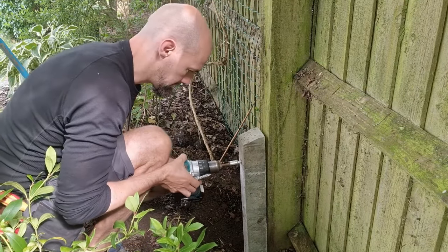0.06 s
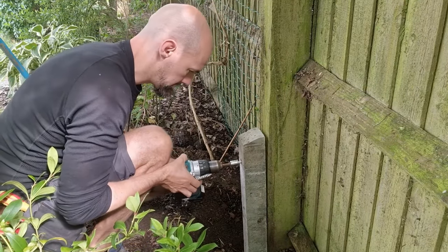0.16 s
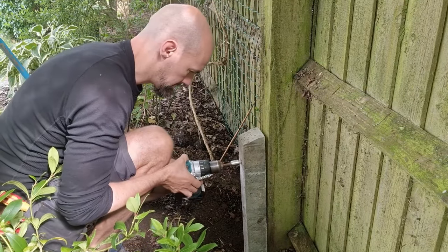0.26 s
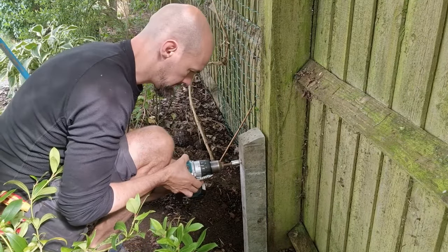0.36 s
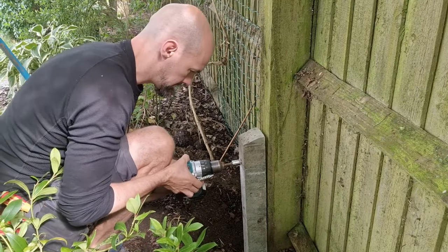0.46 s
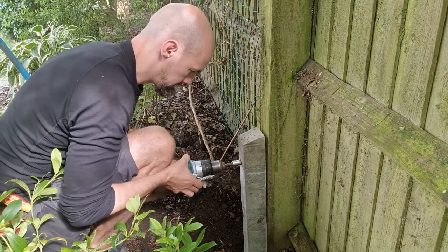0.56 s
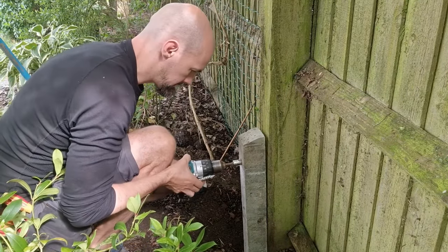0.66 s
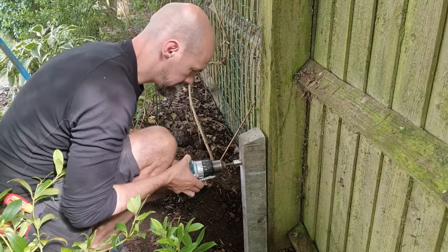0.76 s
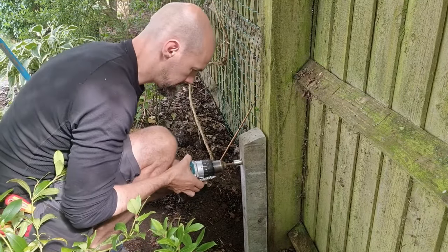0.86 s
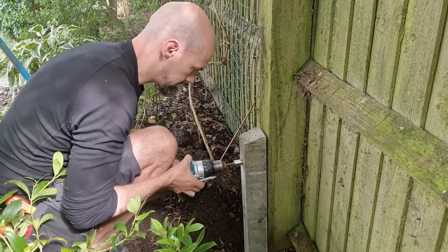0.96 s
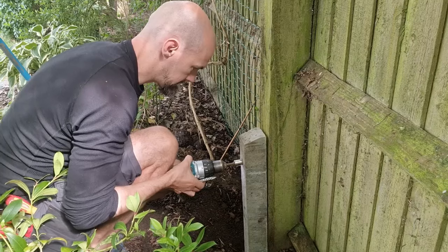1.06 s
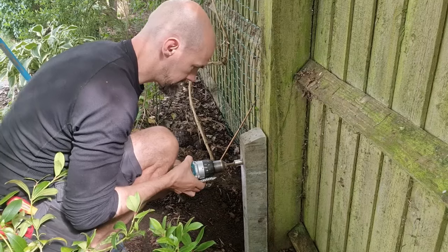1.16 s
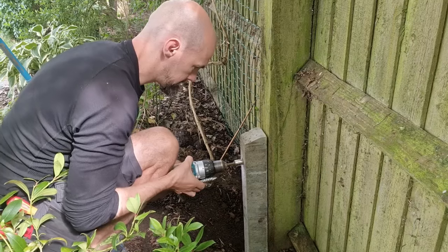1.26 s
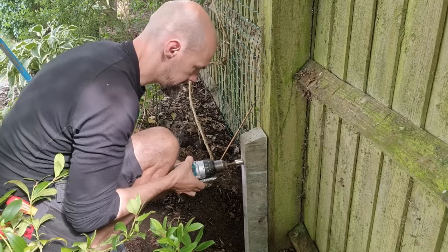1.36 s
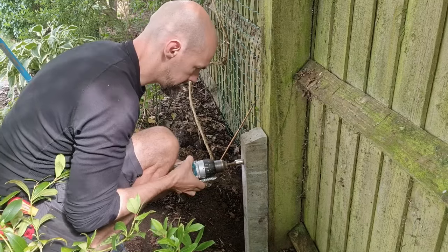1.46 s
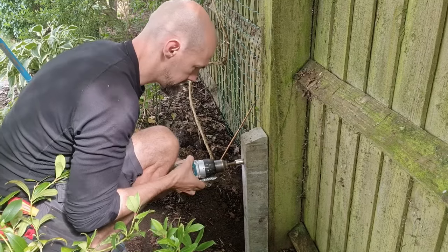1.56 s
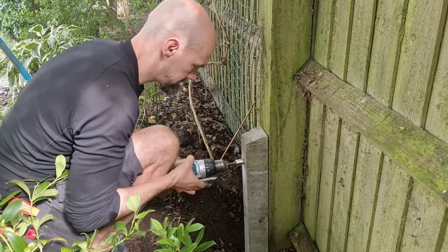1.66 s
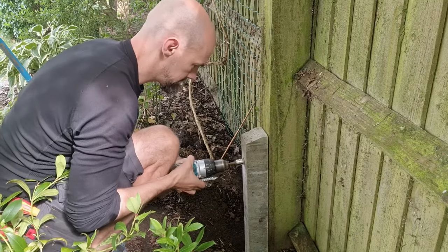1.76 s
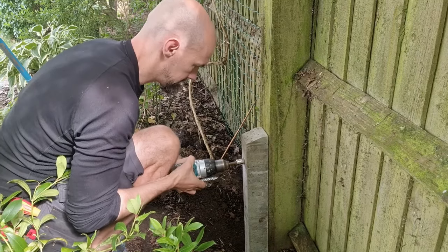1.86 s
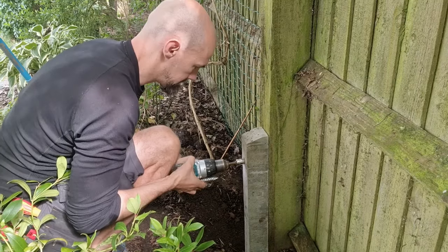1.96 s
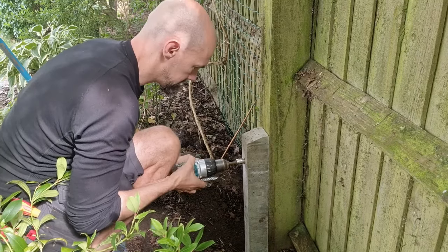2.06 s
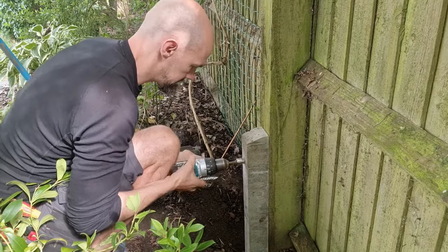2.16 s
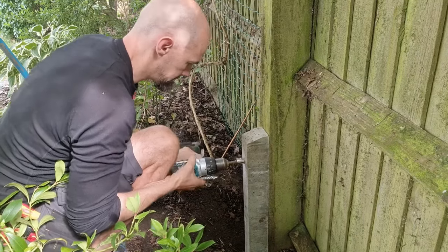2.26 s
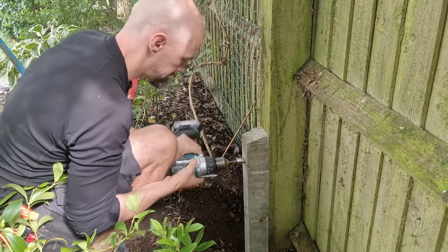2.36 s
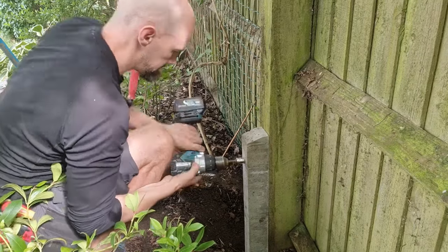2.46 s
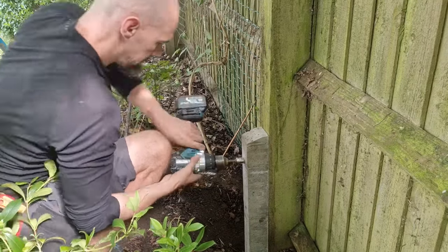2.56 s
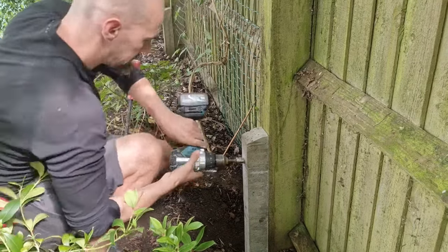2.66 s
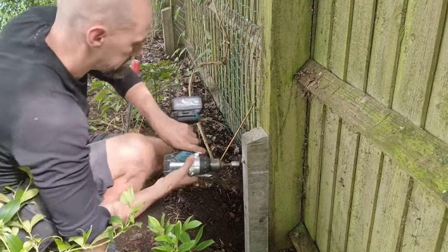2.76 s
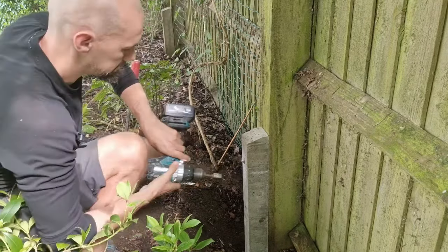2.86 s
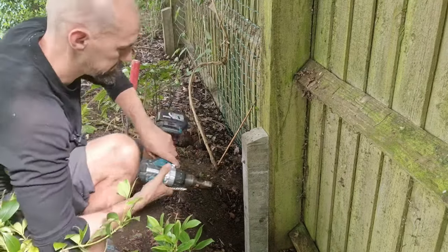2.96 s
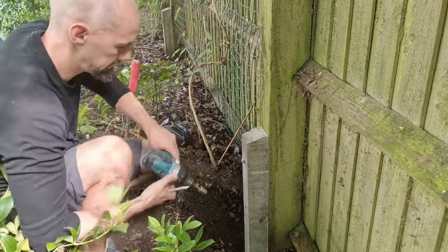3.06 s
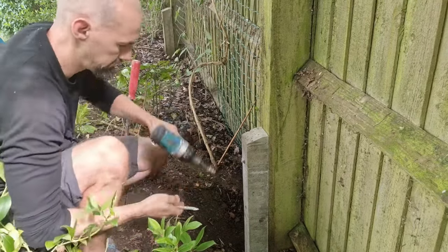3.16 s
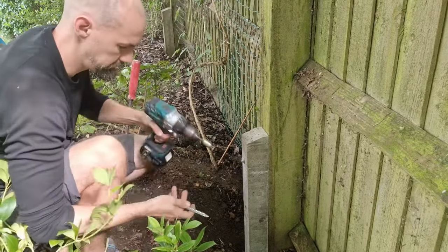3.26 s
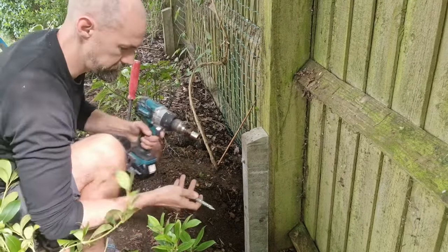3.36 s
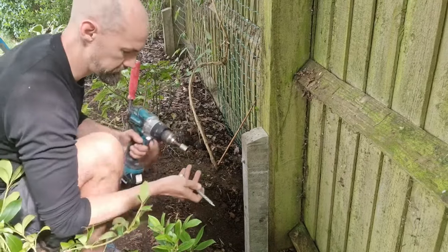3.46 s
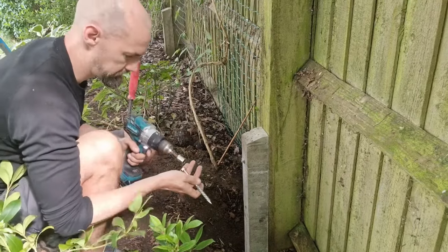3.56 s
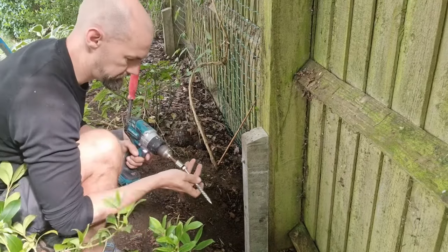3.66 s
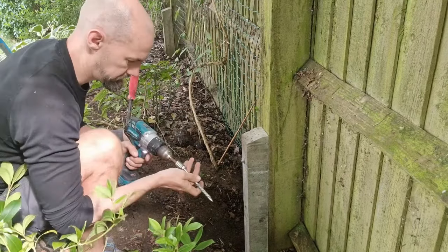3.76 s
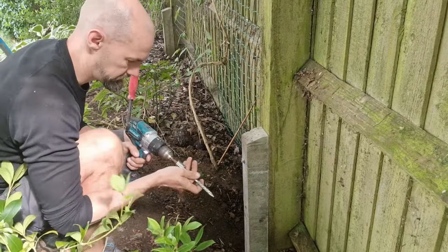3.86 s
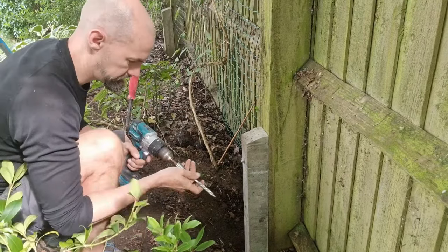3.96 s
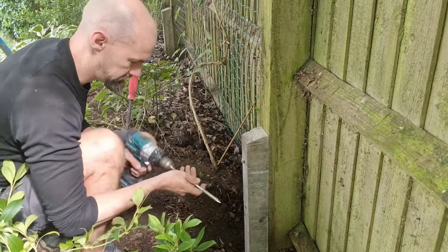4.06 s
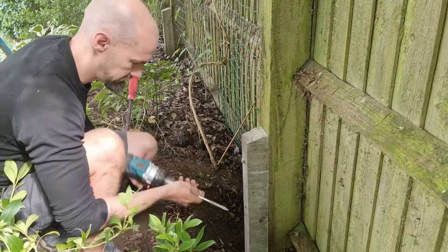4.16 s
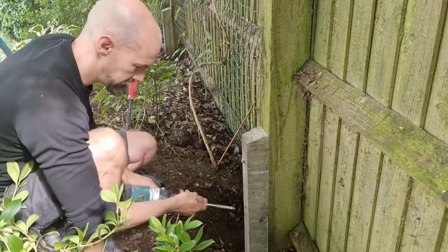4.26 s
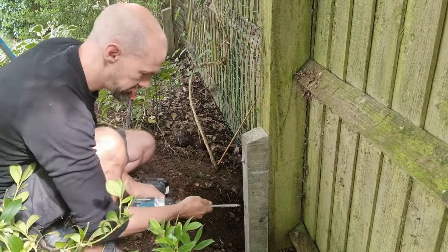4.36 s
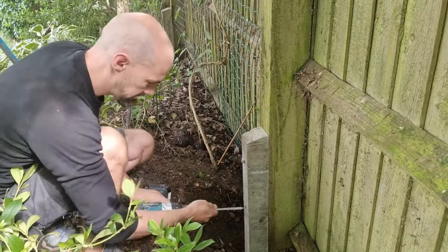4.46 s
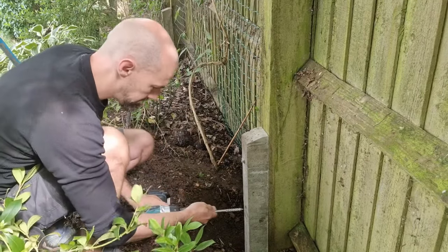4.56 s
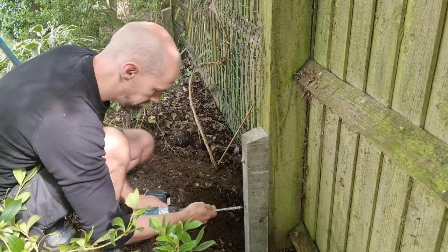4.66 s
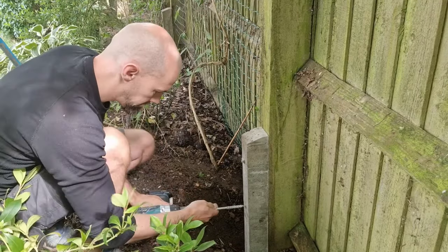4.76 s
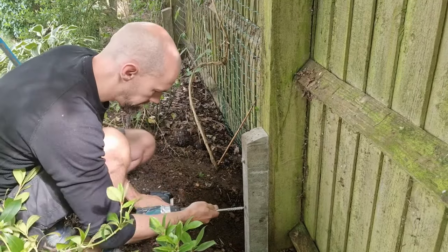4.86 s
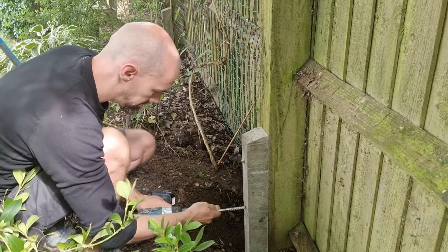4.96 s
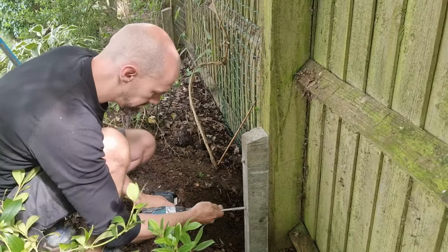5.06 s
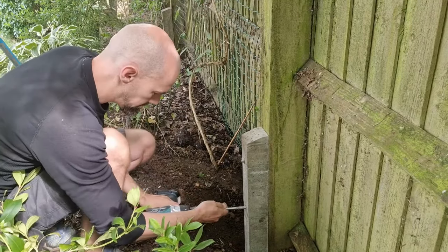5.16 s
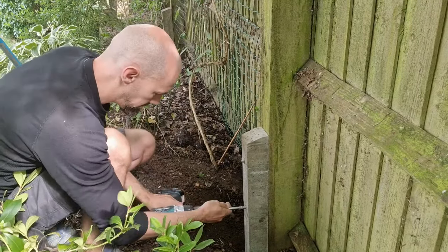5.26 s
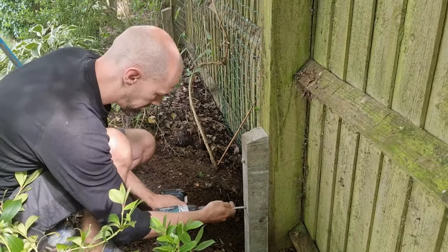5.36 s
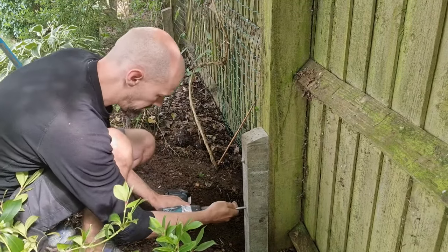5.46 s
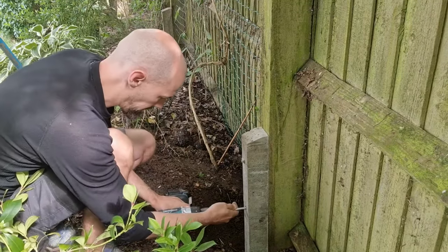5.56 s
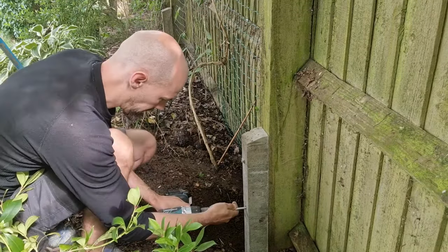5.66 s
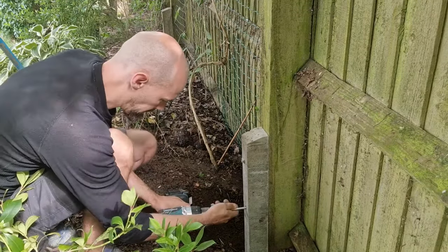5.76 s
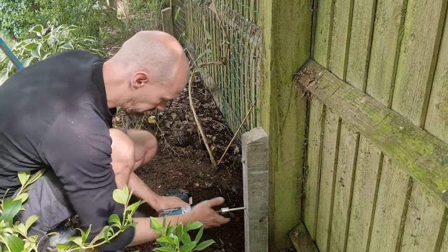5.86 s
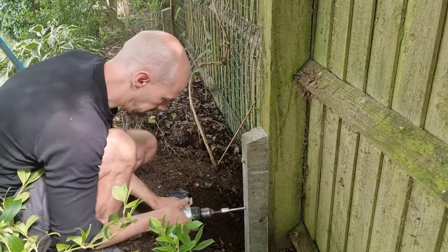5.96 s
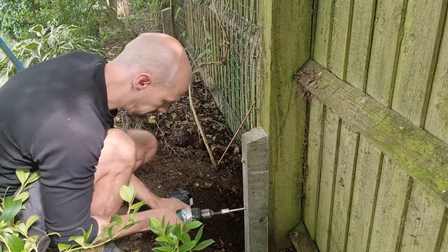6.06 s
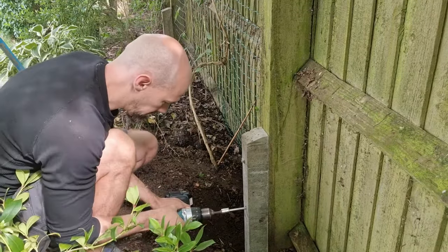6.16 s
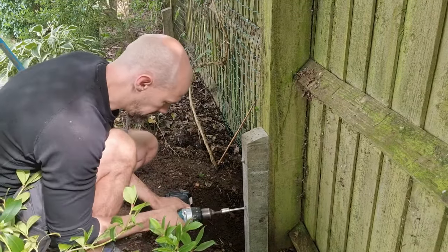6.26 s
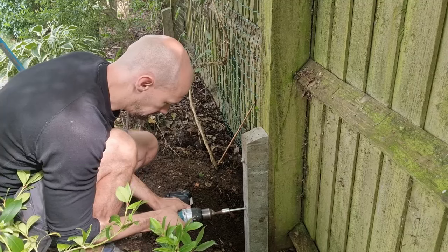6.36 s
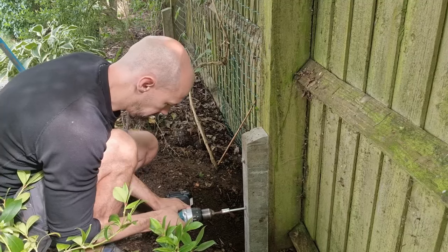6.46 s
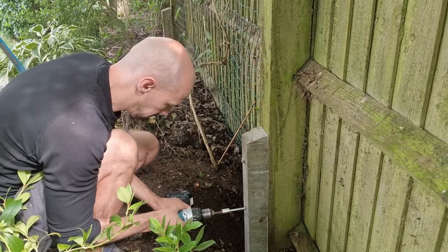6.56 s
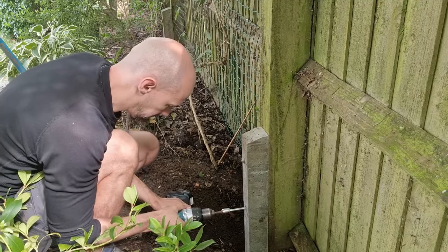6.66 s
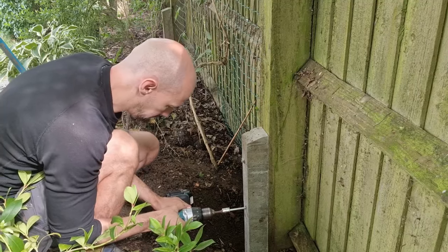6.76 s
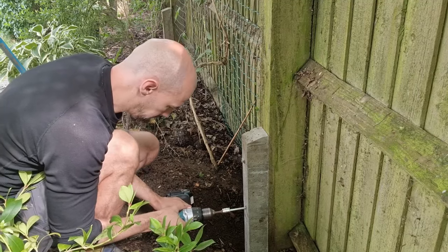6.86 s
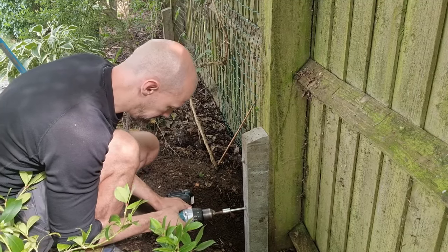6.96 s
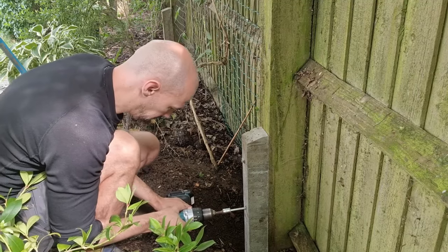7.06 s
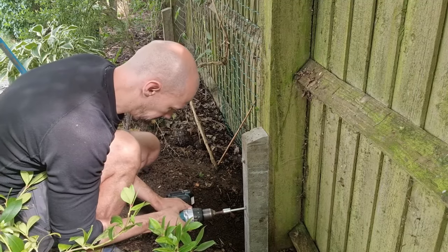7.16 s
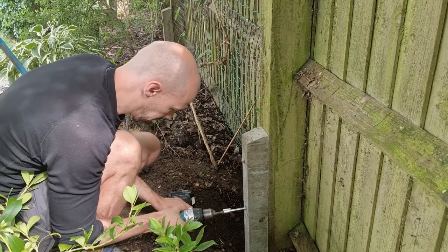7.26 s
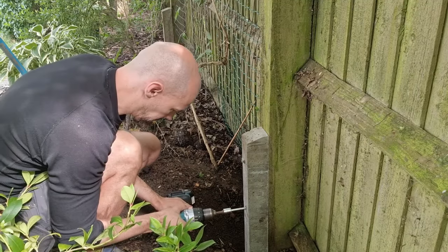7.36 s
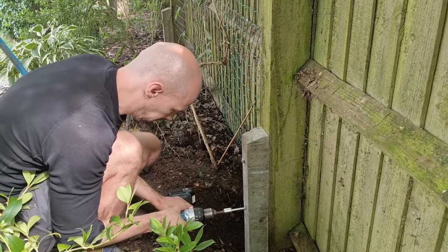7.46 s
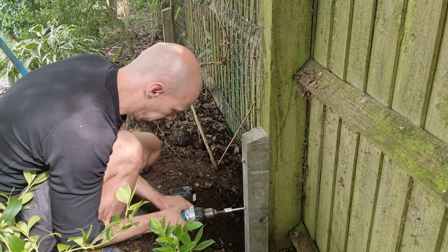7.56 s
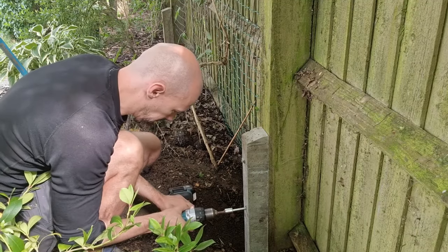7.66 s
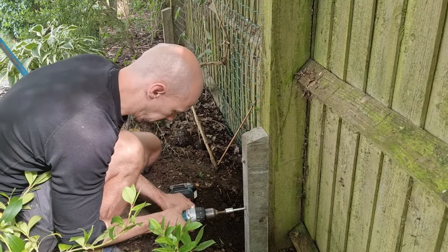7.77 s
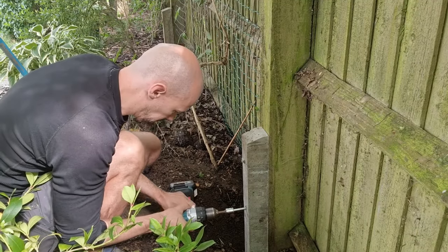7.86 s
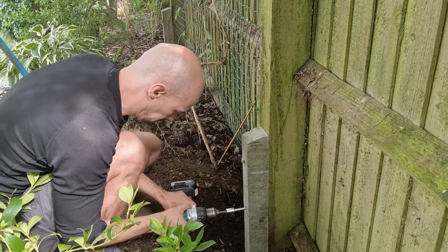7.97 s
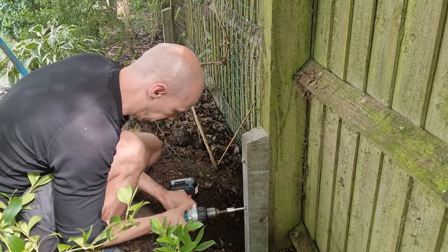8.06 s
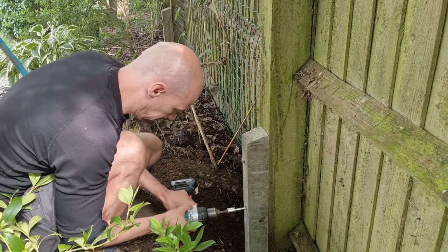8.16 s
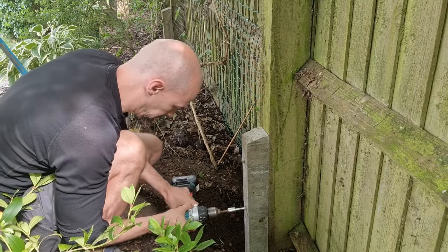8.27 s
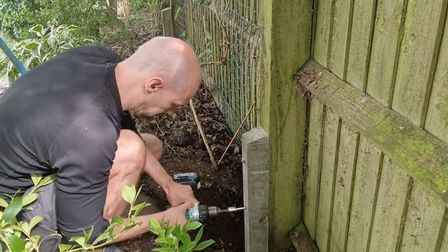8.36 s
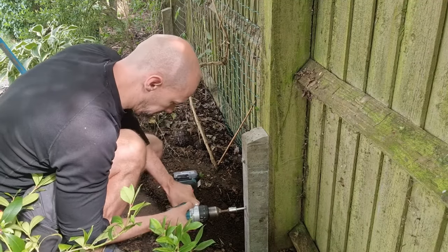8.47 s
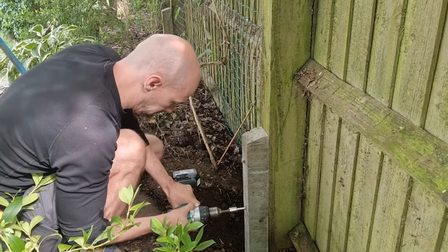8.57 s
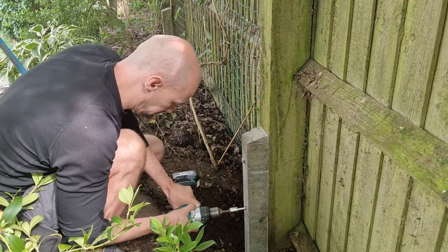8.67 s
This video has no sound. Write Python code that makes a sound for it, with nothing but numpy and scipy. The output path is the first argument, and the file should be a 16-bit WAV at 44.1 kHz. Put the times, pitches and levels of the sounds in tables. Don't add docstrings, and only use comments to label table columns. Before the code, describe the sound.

Nearby dry outdoor sound: a drill already running at full speed quickly slows, creaks along under load and stutters to a stop with a sharp click. Handling clicks, a hard thump and a quick metallic ratcheting mark the bit change. A second run starts as a faint whine, climbs in pitch and settles into loud, rough boring with gear rattle and hiss.

```python
import sys
import numpy as np
from scipy import signal
from scipy.io import wavfile

SR = 44100
rng = np.random.default_rng(int(sys.argv[2]) if len(sys.argv) > 2 else 0)


def generate_wav(sig):
    pcm = np.round(np.clip(np.atleast_2d(sig).T, -1, 1) * 32767).astype(np.int16)
    wavfile.write(sys.argv[1], SR, pcm)


def volts_from_decibels(level):
    exponent = np.asarray(level, float) / 20
    return 10 ** exponent


N = 383669


def rms_one(x):
    return x / np.sqrt(np.mean(x ** 2) + 1e-20)


def in_time(rows):
    s, *columns = np.transpose(rows)
    return [np.interp(np.arange(N) / SR, s, c, -140, -140) for c in columns]


def drift(rate):
    r = np.exp(-32 * np.pi * rate / SR)
    noise = rng.standard_normal(N // 16 + 2002)
    slow = signal.lfilter([1], [1, -2 * r, r * r], noise)[2000:]
    return np.interp(np.arange(N) / 16, np.arange(len(slow)), rms_one(slow))


def band(x, low_hz, high_hz, order=2):
    sos = signal.butter(order, [low_hz, min(high_hz, .45 * SR)], "band", fs=SR, output="sos")
    return signal.sosfilt(sos, x)


def resonate(x, modes):
    out = 0
    for k, (hz, width, db) in enumerate(modes):
        r = np.exp(-np.pi * width / SR)
        top = (1 - r * r) / 2 * np.array([1, 0, -1])
        poles = [1, -2 * r * np.cos(2 * np.pi * hz / SR), r * r]
        out = out + (-1) ** k * volts_from_decibels(db) * signal.lfilter(top, poles, x)
    return out


def grains(per_s, spread_db):
    sizes = volts_from_decibels(spread_db * np.minimum(rng.exponential(1, N), 5)) * rng.choice([-1, 1], N)
    return rms_one(sizes * (rng.random(N) < per_s / SR) + 0.23 * rng.standard_normal(N))


def place(out_s, sound):
    track, at = np.zeros(N + len(sound)), round(out_s * SR)
    track[at:at + len(sound)] = sound
    return track[:N]


def swells(rows, rise_db_s, fall_db_s, floor_db):
    t = np.arange(0, N, 32) / SR
    each = []
    for s, hold, db in rows:
        before, after = np.maximum(s - t, 0), np.maximum(t - s - hold, 0)
        each.append(db - rise_db_s * before - fall_db_s * after)
    return np.interp(np.arange(N) / SR, t, np.maximum(np.max(each, axis=0), floor_db))


def octaves_under(x_hz, hz):
    return np.maximum(np.log2(hz / np.maximum(x_hz, 20)), 0)


def lift(hz, top_hz, half_width_hz, gain):
    return gain / (1 + ((hz - top_hz) / half_width_hz) ** 2)


# t/s, f/Hz, load, level/dB
BORING = [
    (0, 787.7, 0.77, -10),
    (0.45, 770, 1, -10.5),
    (0.6, 754, 1, -11),
    (0.64, 733.3, 0.99, -11),
    (0.68, 644.2, 1, -12.5),
    (0.71, 516.1, 0.38, -13.5),
    (0.76, 372.1, 0.97, -13.5),
    (0.83, 360, 0.95, -14.5),
]
SLOWING = [
    (0.859, 300, 1, -16.5),
    (0.99, 278.2, 1, -17.5),
    (1.08, 274.1, 0.92, -18),
]
CREEPING = [
    (1.25, 281.9, 0.98, -17),
    (1.361, 267.8, 1, -17.5),
    (1.501, 259.9, 0.81, -18),
    (1.64, 257, 0.78, -18.5),
    (1.83, 248.9, 0.87, -17),
    (1.92, 235.9, 1, -16),
    (2.02, 206.9, 1.14, -15),
]
LABOURING = [
    (2.1, 184, 1, -16.5),
    (2.19, 160, 0.83, -16),
    (2.22, 194, 0.89, -15),
    (2.265, 198, 1.2, -13.5),
    (2.3, 258, 1.8, -14.5),
    (2.361, 212.4, 0.76, -12.5),
    (2.431, 271.9, 1.57, -15),
    (2.459, 205.9, 1, -38.5),
    (2.495, 173.8, 1.2, -37),
]
STARTING = [
    (6.225, 25, 0.033, -36.5),
    (6.275, 80, 0, -27),
    (6.3, 113, 0, -20),
    (6.35, 140, 0.03, -20.5),
    (6.4, 157, 0.05, -20.5),
    (6.5, 180, 0.12, -17),
]
SPIN_UP = [
    (6.56, 206.7, 0.11, -16.5),
    (6.62, 249, 0.12, -17),
    (6.7, 384.3, 0.31, -11.5),
    (6.8, 485.4, 0.086, -11),
    (7.0, 613, 0.48, -9.5),
    (7.16, 658, 0.6, -7),
]
BITING = [
    (7.22, 720, 0.95, -8),
    (7.301, 839.4, 0.1, -7.5),
    (7.37, 852, 0.1, -10),
    (7.48, 798.6, 0.72, -6.5),
    (7.601, 854.7, 0.08, -10),
    (7.661, 823, 0.76, -7.5),
    (7.75, 810, 0.92, -9),
    (8.4, 750.3, 1, -10),
    (8.7, 721.5, 1, -9),
]
# f/Hz, half width/Hz, level/dB
SLOT_MODES = [(3517, 190, 12), (1780, 60, 6.5), (2150, 130, -15), (1330, 150, -8)]


def drill_state():
    t = np.arange(N) / SR
    first = in_time(BORING + SLOWING + CREEPING + LABOURING)
    speed, load, effort = np.maximum(first, in_time(STARTING + SPIN_UP + BITING))
    later = t > 4
    burst = lambda db_1, db_2: np.where(later, db_2, db_1)
    below = lambda hz: octaves_under(speed, hz)
    full_hz = 780
    speed = speed * (1 + (0.00418 + 0.029 * ~later * below(251.5)) * drift(9.39))
    bind, free = np.maximum(load - 1, 0), 1 - np.clip(load, 0, 1)
    shallow = later * (1 - np.clip((t - 7.27) / 0.97, 0, 1))
    loaded = later * (1 - free)
    fade = burst(2, 1) * np.minimum(effort + 25, 0)

    output = burst(-14, -19) - 23 * below(full_hz - 50) - 6 * free - 6 * shallow - 19 * shallow ** 8
    middle = burst(-26, -20) - 27 * free - 90 * below(202) + 7 * bind
    middle = middle + lift(2.6 * speed, 540, 55, 10)
    hum = burst(-25.5, -26.5) - 13 * (1 - shallow ** 1.14) * (1 - free) - 70 * below(260.0)
    slot = burst(-20, -18.5) - (5 + 30 * (1 - free) * (1 - shallow)) * below(full_hz) + 30 * bind
    slot = slot - 13 * loaded + 3 * loaded * drift(8.8) - 60 * below(110) - 6 * below(170)
    slot = slot + sum(lift(4 * speed, *mode) for mode in SLOT_MODES)
    slot = slot + later * lift(4 * speed, 3050, 120, 11)
    strain = -53 - 60 * later + lift(3 * speed, 560, 44, 33) + 4 * drift(12)
    labour = -39.5 - 60 * later - 40 * np.maximum(np.log2(np.maximum(speed, 20) / 270), 0)
    labour = labour + 5 * below(204) + 2.5 * drift(12)

    grind = effort - 8.5 - 5 * shallow + 3.46 * (1 - shallow) * below(full_hz)
    buzz = effort + burst(-12.5, -8) + burst(-5, 2.1) * below(full_hz) + 14 * bind - 14 * below(110)
    hiss = effort + burst(-16.5, -18) - 7 * (1 - shallow) * below(full_hz)
    hiss = hiss - 19 * shallow ** 0.49 + 12 * bind
    whine_levels = [x + fade for x in (output, middle, hum, slot, strain, labour)]
    return speed, whine_levels, [effort, grind, buzz, hiss], effort + burst(-29, -52)


def tone(turns, multiple, smear):
    return np.sin(2 * np.pi * multiple * turns + smear * np.sqrt(multiple) * drift(24.0))


# multiple of commutation, level/dB within the family
FAMILIES = [
    [(.648, 0), (1.296, -14)],
    [(2.545, 0), (2.68, -8), (5.36, -12)],
    [(1, -2), (2, 1), (3, -2)],
    [(4, 0), (8, -17)],
    [(3, 0), (5.09, -9)],
    [(.61, -8), (3.25, -2), (4.05, -2), (4.48, -4), (5.45, 0)],
]


def gear_whines(speed, turns, levels):
    out, t = 0, np.arange(N) / SR
    radiate = lambda hz: -12 * octaves_under(hz, 520)
    for family, level_db in zip(FAMILIES, levels):
        for multiple, db in family:
            weak = 0
            if multiple == 1:
                weak = 2 * radiate(speed) - radiate(family[-1][0] * speed)
            if multiple == 1.296:
                weak = np.where(t < 4, -5, 3)
            if multiple == 3 and family is FAMILIES[2]:
                weak = 2 * radiate(speed * 1.1)
            if multiple in (1, 2):
                weak = weak + lift(multiple * speed, 960, 110, 9)
            out = out + volts_from_decibels(level_db + db + weak + 2 + 1.3 * drift(30)) * tone(turns, multiple, .16)
    return out


# multiple, first hole level/dB, free run-up level/dB, second hole level/dB
TEETH = [(5, -11, -8, -19), (5.09, -15, -16, -15), (5.41, -20, -16, -12), (6, -22, -11, -24),
         (7, -24, -12, -22), (8, -24, -9, -24), (10.12, -14, -13, -14), (10.6, -13, -18, -14),
         (11.16, -11, -18, -14), (11.65, -15, -18, -14), (12.2, -17, -9, -14), (13.2, -10, -14, -14),
         (14.2, -12, -14, -14), (14.9, -13, -14, -14), (15.82, -7, -14, -14), (16.8, -11, -14, -14),
         (17.7, -11, -14, -14)]


def tooth_tones(speed, turns, rattle_db):
    out, stage = 0, np.searchsorted([4, 7.3], np.arange(N) / SR)
    slow_db = -45 * octaves_under(speed, 250)
    for multiple, *stage_db in TEETH:
        hz = multiple * speed
        housing = lift(hz, 3080, 260, 1) + lift(hz, 4120, 330, .9)
        level = rattle_db + np.array(stage_db)[stage] + slow_db + 2.8 * drift(14)
        out = out + housing * volts_from_decibels(level) * tone(turns, multiple, .36)
    return out


def rotor_shake(speed, turns, output_db):
    level = -38.0 + 0.5 * (output_db + 17.0) - 60 * (speed < 600) + 5 * drift(23)
    return volts_from_decibels(level) * tone(turns, .25, 0.42)


# carrier multiple, commutation multiple, level/dB
SIDEBANDS = [(1, 1, 0), (1, -1, -4), (1, 0, -10), (1, -2, -12), (2, -1, -20)]


def switching(speed, turns, rattle_db):
    out, t = 0, np.arange(N) / SR
    level = -35.5 - 16 * np.clip((speed - 480) / 300, 0, 1)
    level = level - 6 * np.clip((130 - speed) / 100, 0, 1)
    level = level - 60 * (rattle_db < -37.5) - 60 * (rattle_db < -28) * (t < 4)
    for carrier, side, db in SIDEBANDS:
        phase = 2 * np.pi * (carrier * 7880 * t + side * turns)
        out = out + volts_from_decibels(level + db + 1.65 * drift(7.8)) * np.sin(phase)
    return out


def whines(speed, turns, levels, rattle_db):
    out = gear_whines(speed, turns, levels) + tooth_tones(speed, turns, rattle_db)
    out = out + rotor_shake(speed, turns, levels[0]) + switching(speed, turns, rattle_db)
    return np.sqrt(2) * (speed > 0) * out


# f/Hz, width/Hz, level/dB
HOUSING = [(2973, 600, 1), (3536, 310, 3.5), (4200, 560, 4), (5036, 896, 5), (5720, 1570, -1),
           (8470, 1560, -12.5)]
BUZZ = [(1590, 910, 1), (1806, 280, 10.7), (3140, 490, 0.5)]
POST = [(360, 112, -3), (617, 122, 4), (720, 67, 8), (935, 450, 3.5)]


def work(turns, rattle_db, grind_db, buzz_db, hiss_db):
    fast = np.clip(np.gradient(turns) * SR / 600, .25, 1)
    pulse = 1 + fast * (.3 * np.cos(np.pi * turns / 2) + .2 * np.cos(2 * np.pi * .097 * turns))
    steps = (1 + (.9 - .9 * fast) * np.cos(2 * np.pi * turns)) ** 2
    teeth = pulse * grains(9000, spread_db=-3.0)
    rattle = resonate(teeth, HOUSING) + volts_from_decibels(-13.5) * band(teeth, 3420, 6200)
    rattle = band(rattle, 900, 9100, order=5)
    buzz = resonate(steps * volts_from_decibels(2.7 * drift(25)) * grains(6000, spread_db=-0.5), BUZZ)
    grind = resonate(grains(2500, spread_db=3.0), POST)
    hiss = band(pulse * grains(7000, spread_db=-0.5), 6500, 15000)
    shake = 0.43 * drift(7.1)
    layers = [(rattle, rattle_db), (buzz, buzz_db), (grind, grind_db), (hiss, hiss_db)]
    return sum(rms_one(x) * volts_from_decibels(db - 3.0 + shake + 1.0 * drift(12.4)) for x, db in layers)


# start t/s, top t/s, end t/s, f/Hz, width/Hz, level/dB
SQUEAL = [
    (7.35, 7.85, 8.3, 4320, 320, -11.5),
    (1.95, 2.25, 2.46, 4350, 260, -24),
]


def squeal(turns):
    out, t = 0, np.arange(N) / SR
    planet_knocks = np.diff(np.floor(.097 * turns), prepend=0) * 18 + rng.standard_normal(N)
    for start, top, end, hz, width, db in SQUEAL:
        swell = np.interp(t, [start, top, end], [0, 1, 0]) ** .6
        mode = [(hz, width, 0)]
        ring = rms_one(resonate(resonate(planet_knocks, mode), mode))
        out = out + volts_from_decibels(db + 1.5 * drift(26)) * swell * ring
    return out


# t/s, peak level/dB, f/Hz
CHIPS = [(1.1316, -26, 10710), (1.339, -30, 10890), (1.8422, -23, 11280), (1.928, -22, 12100),
         (2.0565, -28, 13100), (2.3071, -15.5, 13500), (6.344, -53, 11200), (6.511, -30, 12800),
         (7.0142, -31, 11790), (7.1261, -29.5, 11140), (7.445, -23, 11450)]


def chips():
    out, t = 0, np.arange(1500) / SR
    for s, db, hz in CHIPS:
        snap = band(rng.standard_normal(len(t)), hz * 0.88, hz * 1.15)
        out = out + place(s, volts_from_decibels(db) * snap * 2.0 * volts_from_decibels(-60 * t / 0.043))
    return out


# t/s, peak level/dB
KNOCKS = [
    (4.445, -1),
    (4.729, -18.5),
    (3.588, -38),
]
# f/Hz, level/dB, t60/s
KNOCK_MODES = [
    [(335, 1.5, 0.02), (830, -15.5, 0.068), (953, -14, 0.12), (1087, -3.5, 0.059), (1180, -19, 0.04),
     (2730, -23, 0.057), (288, -23, 0.15), (214, -27, 0.2)],
    [(369, 3, 0.087), (770, 6, 0.023), (2020, -17, 0.038)],
    [(8791, 21, 0.05), (8904, 19, 0.06), (8870, 8, 0.16), (3720, 8, 0.035)],
]


def knocks():
    out, t = 0, np.arange(12000) / SR
    for (s, db), modes in zip(KNOCKS, KNOCK_MODES):
        rings = sum(volts_from_decibels(m) * volts_from_decibels(-60 * t / t60) * np.sin(2 * np.pi * hz * t) for hz, m, t60 in modes)
        crack = volts_from_decibels(5.5) * band(rng.standard_normal(len(t)), 290, 2770) * volts_from_decibels(-60 * t / 0.028)
        attack = np.minimum(t / 0.00096, 1)
        for lag, less_db in [(0, 8), (.006, -5.5), (.014, -6.5)]:
            out = out + place(s + lag, volts_from_decibels(db + less_db) * (rings + crack) * attack)
    return out


# t/s, peak level/dB, ring f/Hz, body level/dB, brightness level/dB
CLICKS = [(2.45, -2, 2630, -6.5, -10), (2.592, -32, 830, -3, -16), (2.679, -33, 563, -2, -6),
          (2.708, -15, 550, -13, 5), (3.483, -12, 1900, -13, 4), (3.586, -11, 3670, -7.5, 8),
          (3.685, -18.5, 900, -2.5, 3), (3.719, -23, 784, -17, -30), (3.738, -26, 3760, 2, -19),
          (3.76, -12, 3440, -14, -3), (3.8, -11, 550, -14, -9), (3.818, -15, 1510, -4.5, -9),
          (3.954, -24, 960, -15, -36), (4.108, -32, 900, -6.5, -14)]
FITTING = [ (4.569, -18, 2290, 0, 10.5), (4.779, -19, 312, -8, -19), (4.979, -24.5, 362, -13, -31),
           (5.043, -26, 1250, -14, 12), (5.524, -22.5, 355, -18, -7), (5.558, -19, 11100, -12, 1),
           (5.585, -20.5, 6580, -10.5, 4), (5.671, 0, 8300, -20, 1), (5.758, -15, 1290, -8.5, 0),
           (5.948, -11, 710, -8, -32), (6.02, -28.5, 770, -8, -10), (6.088, -27.5, 820, -3.5, -1),
           (6.226, -23.5, 7760, -2, -33)]


def clicks():
    out, t = 0, np.arange(6000) / SR
    for s, db, hz, body_db, bright_db in CLICKS + FITTING:
        noise = rng.standard_normal((3, len(t)))
        t60 = 0.035 * (1000 / hz) ** 0.19
        fall = volts_from_decibels(-60 * t / t60) * np.minimum(t / 0.0018, 1) ** 2
        ring = np.sin(2 * np.pi * hz * t) * 0.65 + 0.6 * rms_one(band(noise[0], hz * 0.85, hz * 1.17))
        body = band(noise[1], 330, 2870) + resonate(noise[1], [(3530, 140, 1)])
        body = volts_from_decibels(body_db + 7.0) * rms_one(body)
        crack = volts_from_decibels(bright_db + 1.5) * rms_one(band(noise[2], 5200, 19700)) * fall
        out = out + place(s, volts_from_decibels(db - 4.5) * fall * (ring + body + crack))
    return out


# f/Hz, width/Hz, level/dB
CHUCK = [(524, 570, -3), (1095, 193, 4.5), (1540, 160, -4), (2470, 430, -11.5), (3290, 250, -11),
         (4540, 230, -18), (6080, 290, -16)]
# t/s, peak level/dB
CATCHES = [(5.035, -29), (5.058, -28), (5.086, -21), (5.123, -14), (5.133, -10), (5.174, -9), (5.221, -17),
           (5.254, -8), (5.317, -18), (5.375, -11), (5.437, -13)]


def ratchet():
    t = np.arange(N) / SR
    twist = np.clip((t - 5.058) / 0.004, 0, 1) * np.clip((5.463 - t) / 0.006, 0, 1)
    pawl = (rng.random(N) < 240 / SR) * volts_from_decibels(2.6 * rng.standard_normal(N))
    rub = signal.lfilter([1], [1, -0.985], pawl) * rng.standard_normal(N)
    sleeve = rms_one(resonate(rms_one(rub) + 0.9 * grains(900, spread_db=2.0), CHUCK))
    jaws = 0
    for s, db in CATCHES:
        fall = volts_from_decibels(db + 4.5 - 60 * t[:3000] / 0.048)
        jaws = jaws + place(s, fall * rng.standard_normal(3000))
    return volts_from_decibels(-29 + 1.3 * drift(26)) * twist * sleeve + resonate(jaws, CHUCK)


# t/s, length/s, level/dB, centre f/Hz
SCUFFS = [
    (2.955, .011, -27, 7300),
    (2.985, .012, -28, 7600),
    (2.996, 0.015, -35, 7600),
    (3.02, .012, -27, 7500),
    (3.03, 0.013, -30, 7000),
    (3.054, 0.0078, -37, 7600),
    (3.063, 0.0043, -31, 7600),
    (3.07, .007, -28.5, 7600),
    (3.472, .012, -34, 5200),
    (4.769, 0.014, -39.5, 2800),
]
# t/s, peak level/dB
TICKS = [(5.0828, -28), (5.116, -22), (5.1596, -25), (5.1916, -22), (5.234, -28), (5.2549, -34),
         (5.2978, -23), (5.321, -22), (5.3472, -36), (5.3682, -27), (5.3866, -24), (5.4405, -29),
         (5.454, -25)]


def scuffs():
    out, t = 0, np.arange(2000) / SR
    pawl_ticks = [(s, 0.0083, db - 11.0, 12000) for s, db in TICKS]
    for s, length, db, hz in SCUFFS + pawl_ticks:
        noise = rng.standard_normal(2000)
        shape = np.clip(np.minimum(t, length - t) / 0.0021, 0, 1)
        narrow = rms_one(band(noise, hz * 0.89, hz * 1.11))
        skirt = 0.78 * rms_one(band(noise, hz * 0.67, hz * 1.6))
        out = out + place(s, volts_from_decibels(db) * shape * (narrow + skirt))
    return out


# delay t/s, level/dB
ECHOES = [
    (.011, -21),
    (.031, -21.5),
]


def echoes(hits):
    return sum(volts_from_decibels(db) * place(lag, band(hits, 130, 3300, order=1)) for lag, db in ECHOES)


# t/s, length/s, level/dB, brightness level/dB
MOVES = [(2.44, 0.073, -38.5, -7), (2.544, 0.059, -42.5, -3), (2.675, 0.071, -43.5, -1.5),
         (2.974, 0.073, -48.5, 19.5), (3.086, 0.21, -53, -4), (3.402, 0.15, -53.5, 9.5),
         (3.556, 0.31, -48, 4.5), (3.724, 0.19, -44.5, -9), (4.169, 0.16, -36.5, -6),
         (4.347, 0.01, -37.5, 12.5), (4.435, 0.054, -38.5, 3), (4.546, 0.077, -52, 7),
         (4.795, 0.094, -53.5, 2), (5.093, 0.12, -36.5, -9), (5.321, 0.091, -32, -9),
         (5.542, 0.24, -54, 12), (5.926, 0.038, -37, -6), (6.05, 0.054, -51, 1)]


def rustle():
    levels = []
    for less_db, share in [(0.5, 0.15), (-4.5, 0.12), (-1.5, 0.78)]:
        rows = [(s, hold, db + less_db + share * tilt_db) for s, hold, db, tilt_db in MOVES]
        levels.append(swells(rows, rise_db_s=490, fall_db_s=210, floor_db=-57.5))
    clump = volts_from_decibels(7.1 * drift(35))
    dull_modes = [(388, 170, 0.5), (820, 360, 0.5), (1090, 94, 2.5), (1530, 620, -5.5)]
    dull = resonate(grains(600 * clump, spread_db=3.5), dull_modes)
    fine = grains(1200 * clump, spread_db=2.5)
    middle = resonate(fine, [(2300, 450, 0), (3350, 450, 0), (4600, 900, -7)])
    ticks = volts_from_decibels(3 * drift(40)) * grains(6000, spread_db=2.5)
    bright = band(ticks, 2670, 20000) + resonate(ticks, [(7600, 4300, 0.93)])
    return sum(rms_one(x) * volts_from_decibels(db + 2.28) for x, db in zip((dull, middle, bright), levels))


# t/s, level/dB
THUDS = [(0.69, -26.5), (2.44, -37.5), (3.0, -43), (3.5, -46.5), (3.8, -48.5), (4.37, -34), (4.5, -36),
         (4.75, -44.5), (5.15, -37.5), (5.46, -41), (5.7, -48), (5.971, -41), (6.4, -42)]


def ground(shake_db):
    rows = [(s, 0, db) for s, db in THUDS]
    thud_db = swells(rows, rise_db_s=123, fall_db_s=59, floor_db=-61)
    rumble = rms_one(band(rng.standard_normal(N), 50, 303))
    return volts_from_decibels(np.maximum(thud_db, shake_db) + 1.2 * drift(24)) * rumble


# start t/s, end t/s, f/Hz, level/dB
BIRD = [
    (4.4, 4.7, 6200, -55),
    (4.8, 5.05, 4250, -55),
    (4.82, 5.5, 6400, -56),
]


def bird():
    out = 0
    for start, end, pitch_hz, level_db in BIRD:
        size = round((end - start) * SR)
        note = band(rng.standard_normal(size), pitch_hz - 90, pitch_hz + 90)
        out = out + place(start, volts_from_decibels(level_db) * rms_one(note) * np.hanning(size) ** .5)
    return out


def air():
    return volts_from_decibels(-63) * rms_one(band(rng.standard_normal(N), 150, 9000, order=1))


def scene():
    speed, levels, noise, shake_db = drill_state()
    turns = np.cumsum(np.maximum(speed, 0)) / SR
    drill = whines(speed, turns, levels, noise[0]) + work(turns, *noise) + squeal(turns)
    small_body = signal.butter(3, 130, "high", fs=SR, output="sos")
    drill = signal.sosfilt(small_body, drill)
    hits = chips() + knocks() + clicks() + scuffs()
    garden = ground(shake_db) + bird() + air()
    return (drill + hits + ratchet() + echoes(hits) + rustle() + garden)[None]


def band_limit(x):
    return signal.sosfilt(signal.butter(12, 16320, fs=SR, output="sos"), x)


def record(dry):
    rounded = 0.96 * np.tanh(dry / 1.12)
    low_cut = signal.sosfilt(signal.butter(3, 52, "high", fs=SR, output="sos"), rounded)
    top_cut = signal.sosfilt(signal.cheby2(14, 70, 16330, fs=SR, output="sos"), low_cut)
    mix = np.clip(top_cut, -1, 1)
    return band_limit(mix)


dry = scene()
out = record(dry)
generate_wav(out)
```